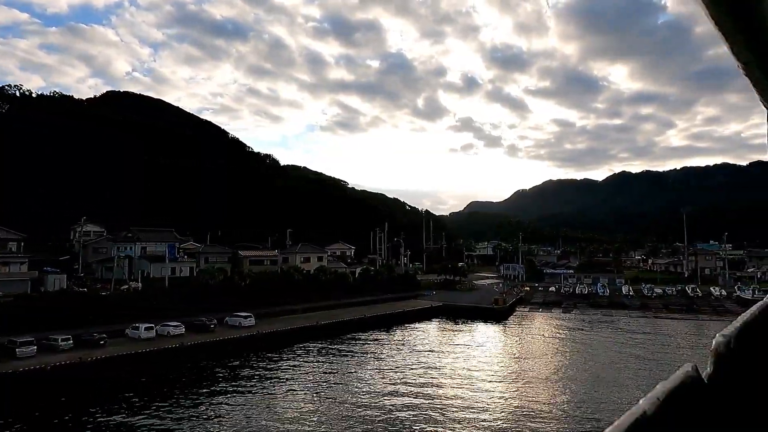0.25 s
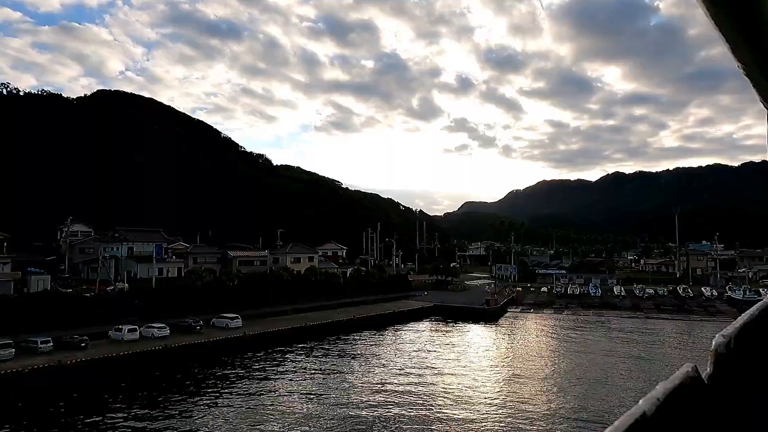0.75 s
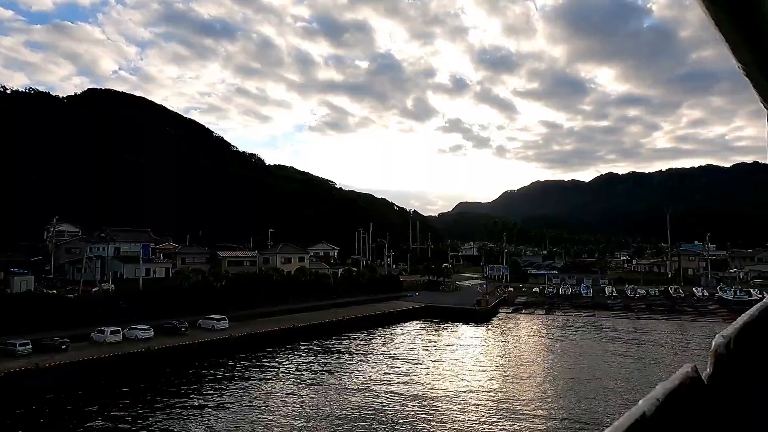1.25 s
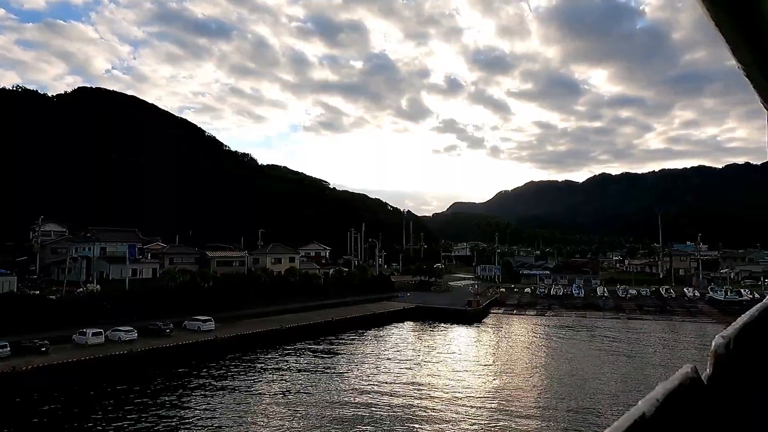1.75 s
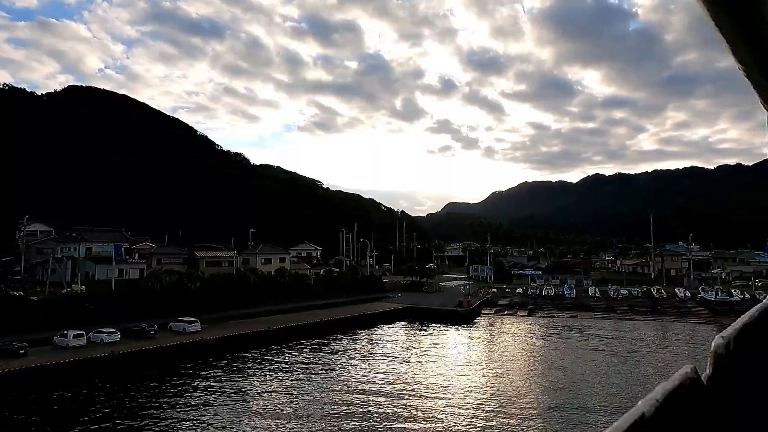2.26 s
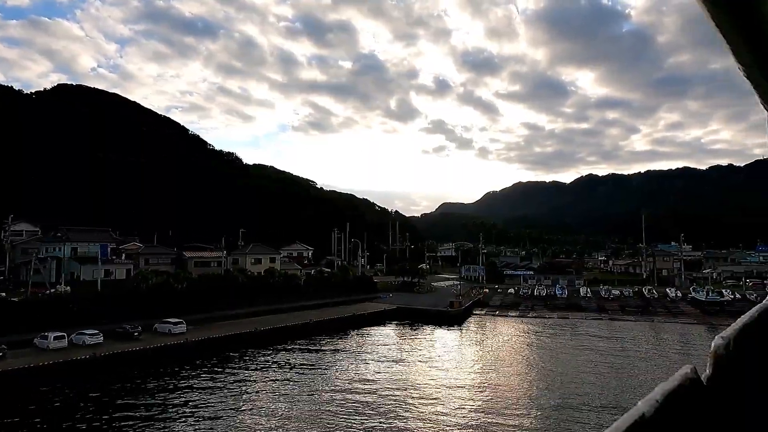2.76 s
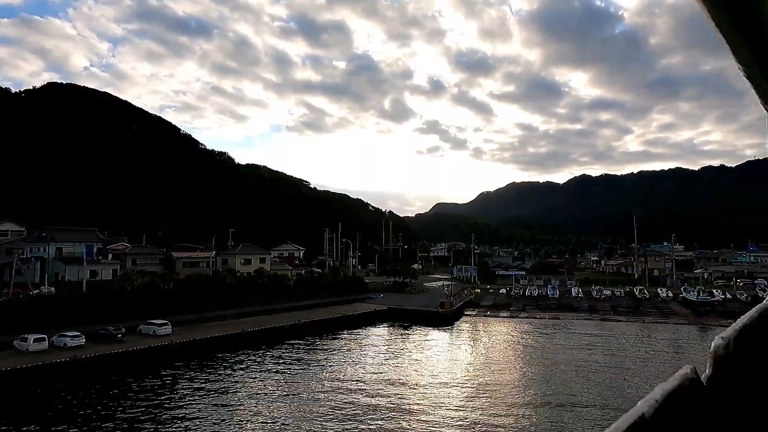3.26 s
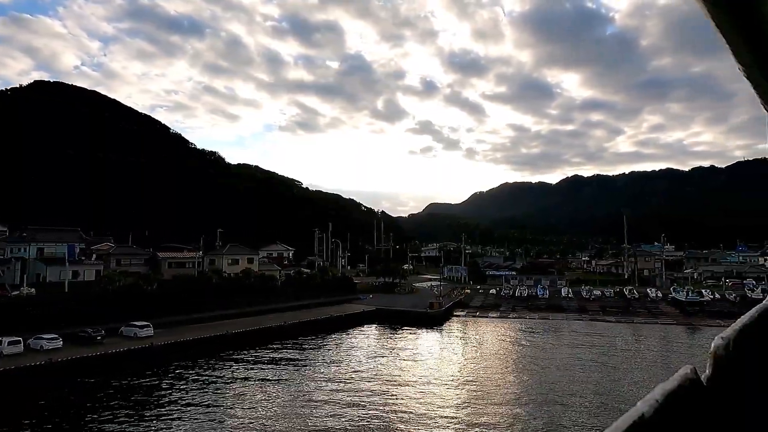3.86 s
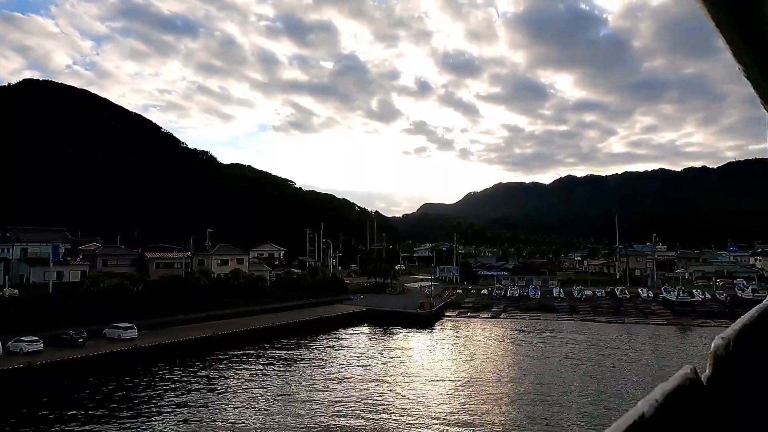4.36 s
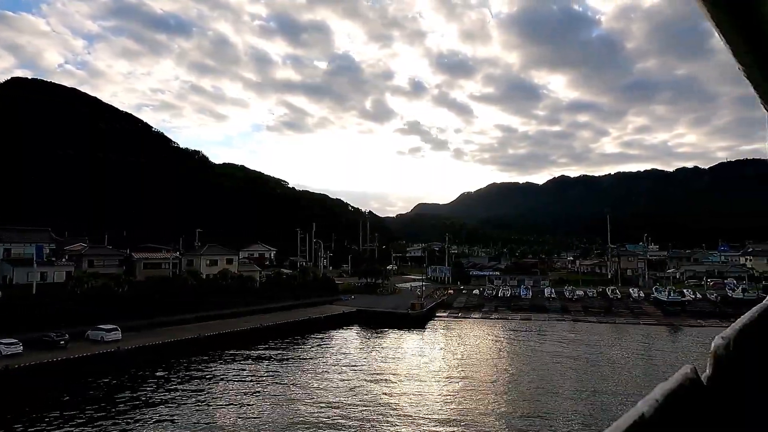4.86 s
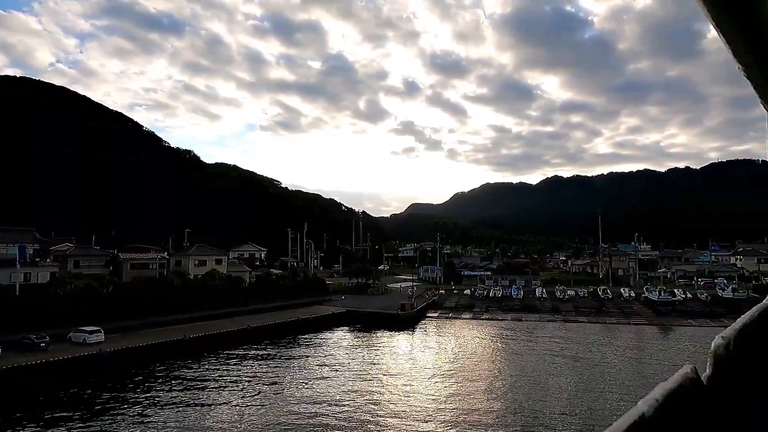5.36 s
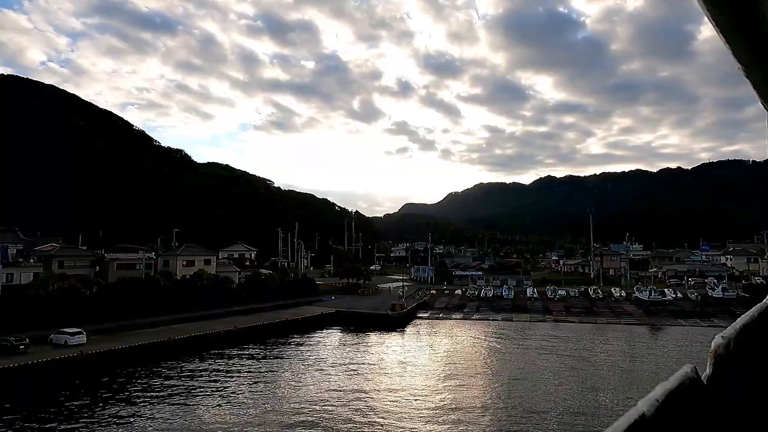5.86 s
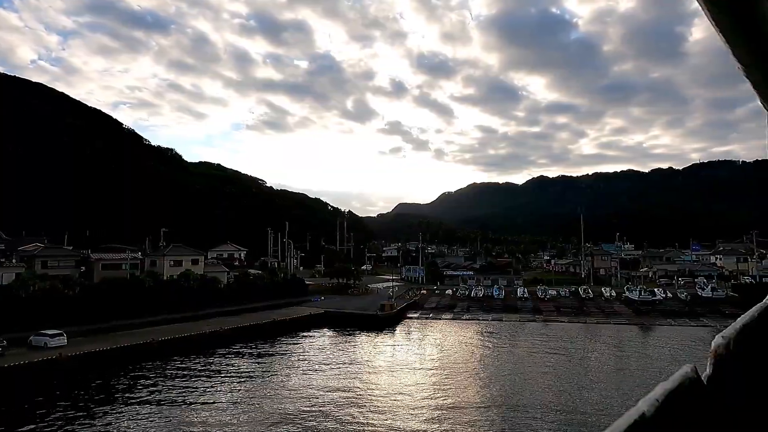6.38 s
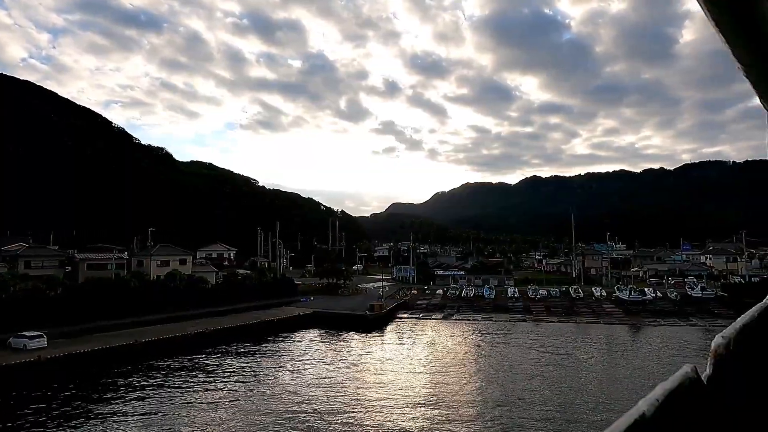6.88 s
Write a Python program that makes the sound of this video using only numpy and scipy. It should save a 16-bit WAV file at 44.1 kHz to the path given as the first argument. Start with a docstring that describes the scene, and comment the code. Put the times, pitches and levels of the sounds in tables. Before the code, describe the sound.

On the open deck of a ferry in a harbour, a low engine rumble pulses and gently surges under steady machine hum and a broad rushing noise. A thin, quiet metallic rattle comes and goes close by, now and then squeaking faintly. Scattered bird chirps are just audible in the distance. Late on, a few small dry clicks sound near the microphone while the drone carries on.

```python
"""A deep, loping engine drone over a wide roar: a ferry idling past a harbour, in stereo on the open deck.
Two slow diesels run slightly apart and beat; a generator set, a geared pump and other machinery add
their tones through the hull, and exhaust, ventilation and wash make the roar. Near the microphone a loose
fitting rattles with each firing of one diesel and sometimes squeaks, and there are a few dry ticks.
Small birds chirp far off on the shore."""
import sys
import numpy as np
from scipy import signal
from scipy.fft import rfft, irfft
from scipy.io import wavfile
from scipy.ndimage import uniform_filter1d

SR = 44100
rng = np.random.default_rng(int(sys.argv[2]) if len(sys.argv) > 2 else 0)


def unload_wav(signal):
    """Save mono or channel-first audio to the path in sys.argv[1] as 16-bit WAV at rate SR, clipped to [-1, 1]."""
    wavfile.write(
        sys.argv[1],
        SR,
        np.round(np.clip(np.atleast_2d(signal).T, -1, 1) * 32767).astype(np.int16),
    )


N = 313992

DIESEL_HZ, CYLINDERS = 2.2797, 6  # first diesel: cycles a second, firings a cycle
LOPE_AT = .47  # its uneven cylinders are loudest this far through each cycle
# The rumble surges and sinks. Each row: time in seconds, level change in dB.
SURGES = [(0.1, 0), (0.8, 0), (1.1, 1.5), (1.6, -.5), (2.2, -2), (2.6, 0), (3.2, 0), (3.7, 2.5), (4.3, -1),
          (4.7, 0), (5.2, 2), (5.6, -1), (5.9, 1.5), (6.3, -3), (7.0, 0)]


def gain_of(db):
    """Decibels to an amplitude factor."""
    return 10 ** (np.asarray(db) / 20)


def unit_rms(x):
    """Scales a signal to rms 1."""
    return x / np.sqrt(np.mean(x ** 2) + 1e-20)


def at_hz(points, hz):
    """Reads rows of frequency and value along a logarithmic frequency axis."""
    f, value = np.transpose(points)
    return np.interp(np.log(hz + 1), np.log(f + 1), value)


def add(mix, start_s, sound):
    """Mixes a sound in at its start time."""
    part = mix[round(start_s * SR):][:len(sound)]
    part += sound[:len(part)]


def drift(top_hz):
    """A slow random wander of rms 1: twelve sines in the decade below top_hz."""
    t = np.arange(0, N + 256, 256) / SR
    rates = np.geomspace(top_hz / 10, top_hz, 12)
    slow = sum(np.sin(2 * np.pi * (f * t + rng.random())) / np.sqrt(f) for f in rates)
    return np.interp(np.arange(N) / SR, t, unit_rms(slow))


def stereo(mid, side, hz):
    """Left and right at the microphone: the bass is central, the treble wide and a little to the left."""
    # Stereo width. Each row: frequency in Hz, side relative to mid in dB.
    width = [(30, -33.5), (60, -43), (110, -33.5), (200, -24), (380, -13.5), (700, -9), (1290, -6),
             (2380, -2), (4400, -4), (8120, -5.5), (15000, -1)]
    # Balance. Each row: frequency in Hz, left over right in dB.
    balance = [(60, 0.0), (110, 0.0), (200, 0.5), (380, 1.5), (700, 1.0), (1290, 1.5), (2380, 1.5),
               (4400, 1.0), (8120, 2.5), (15000, 1.5)]
    side = side * gain_of(at_hz(width, hz))
    lean = gain_of(at_hz(balance, hz) / 2)
    return np.array([(mid + side) * lean, (mid - side) / lean])


def birds():
    """Small birds far off: near-sine glides through three notes, smeared by echoes from the shore."""
    # Each row: start and length in seconds, first, middle and last pitch in Hz, level in dB.
    chirps = [ (.82, .07, 2800, 2700, 2760, -62), (.872, .07, 3320, 3320, 3300, -64),
              (.94, .055, 3290, 3270, 3250, -70), (1.98, .04, 6600, 6650, 6550, -66),
              (2.015, .08, 6600, 5000, 4500, -65), (2.045, .04, 6200, 5350, 4800, -66),
              (2.09, .045, 4500, 4900, 4650, -63), (2.12, .035, 5900, 5450, 4900, -69),
              (2.155, .035, 4850, 5000, 5100, -67), (3.005, .075, 5100, 5000, 5050, -68),
              (3.745, .07, 5150, 4830, 4800, -66), (3.855, .075, 4850, 4380, 4200, -67),
              (4.775, .045, 5000, 5050, 5150, -66), (4.83, .075, 5050, 5250, 4900, -66),
              (4.91, .07, 4800, 4500, 4200, -67), (4.98, .026, 4280, 4180, 4050, -63),
              (4.803, .028, 6450, 5800, 5150, -67), (4.89, .02, 6900, 6650, 6400, -73),
              (4.975, .016, 6850, 6780, 6700, -68), (5.1, .028, 6300, 6050, 5850, -64),
              (5.13, .022, 4750, 4950, 4950, -66), (5.592, .036, 5150, 5150, 5150, -63),
              (5.622, .023, 4350, 4250, 4150, -62), (6.9, .04, 2250, 2300, 2350, -60),
              (6.908, .032, 4650, 4930, 5080, -61), (6.94, .05, 5050, 4920, 5000, -62),
              (6.99, .022, 6900, 6720, 6550, -66), ]
    direct = np.zeros(N)
    for start_s, length_s, first_hz, middle_hz, last_hz, db in chirps:
        u = np.linspace(-1, 1, round(length_s * SR))
        hz = middle_hz + u * (last_hz - first_hz) / 2 + u ** 2 * ((first_hz + last_hz) / 2 - middle_hz)
        tremble = 1 + .017 * unit_rms(uniform_filter1d(rng.standard_normal(len(u)), 120))
        tone = np.sqrt(2) * np.sin(2 * np.pi * np.cumsum(hz * tremble) / SR)
        flutter_db = 2.5 * unit_rms(uniform_filter1d(rng.standard_normal(len(u)), 200)) - 2.5
        add(direct, start_s, gain_of(db + flutter_db) * tone * signal.windows.tukey(len(u), .25))
    t = np.arange(8000) / SR
    shore = rng.standard_normal((2, 8000)) * gain_of(-60 * t / .25) * (t > .008)
    echoes = signal.oaconvolve(direct[None], shore / np.linalg.norm(shore[0]), axes=1)[:, :N]
    return direct * gain_of([[1], [-1]]) + gain_of(-1.5) * echoes


def ticks():
    """Faint dry clicks nearby, dead centre: a soft-edged cycle or two with a little noise behind."""
    # Each row: start in seconds, level in dB, centre frequency in Hz.
    clicks = [(3.28, -63, 10000), (5.912, -63, 10000), (6.0677, -62, 10000), (6.1904, -63, 10000),
              (6.4094, -58, 7000), (5.483, -48, 5000), (5.7152, -46, 8000), (6.2942, -47, 6000)]
    t, out = np.arange(800) / SR, np.zeros(N)
    from_centre_s = t - .0003
    treble_band = signal.butter(2, [4000, 10000], "band", fs=SR)
    for start_s, db, hz in clicks:
        snap = np.sin(2 * np.pi * hz * from_centre_s) * np.exp(-(from_centre_s * hz / .77) ** 2)
        tail = signal.lfilter(*treble_band, rng.standard_normal(800)) * np.exp(-t / .004)
        add(out, start_s, gain_of(db) * (snap + .1 * tail))
    return out


def squeaks():
    """Brief rubs excite one narrow mode of the loose fitting, a little left of the microphone."""
    # Each row: start in seconds, level in dB.
    rubs = [(0.124, -73), (0.272, -73), (0.487, -70), (0.714, -75), (0.866, -71), (0.92, -73), (1.092, -66),
            (1.143, -73), (1.3, -83), (1.37, -78), (1.58, -71), (2.47, -78), (3.35, -79), (3.79, -75),
            (4.006, -74), (5.332, -71), (5.393, -75), (6.415, -69)]
    mode_hz, width_hz, length_s = 8540, 120, .033
    radius = np.exp(-np.pi * width_hz / SR)
    resonator = [1, -2 * radius * np.cos(2 * np.pi * mode_hz / SR), radius ** 2]
    out = np.zeros(N)
    for start_s, db in rubs:
        rub = rng.standard_normal(3000)[:round(length_s * SR)]
        ring = unit_rms(signal.lfilter([1], resonator, rub))
        add(out, start_s, gain_of(db) / np.sqrt(2) * ring * signal.windows.tukey(len(rub), .6))
    return out * gain_of([[1.5], [-1.5]])


def shakes():
    """Start in seconds and level in dB of the shake from each firing: mostly faint, some hard."""
    # Firings that shake the fitting harder. Each row: rough time in seconds, level in dB.
    hard_shakes = [(0.06, -57), (0.205, -56), (0.28, -50.5), (0.35, -58), (0.5, -53), (0.71, -57.5),
                   (0.87, -53), (0.94, -57.5), (1.08, -54), (1.16, -54), (1.23, -58), (1.38, -61),
                   (1.45, -60), (1.59, -57), (1.88, -55), (2.11, -61), (2.32, -57), (2.55, -64),
                   (2.62, -60), (2.7, -64), (2.77, -55), (2.99, -51.5), (3.21, -55), (3.35, -62),
                   (3.57, -62), (3.72, -61), (3.79, -57), (3.86, -54), (4.01, -59), (4.23, -58),
                   (4.45, -63), (4.67, -63), (4.89, -63), (5.1, -64), (5.17, -59), (5.25, -63), (5.4, -57),
                   (5.62, -61), (5.84, -58), (6.05, -63), (6.27, -53), (6.49, -55), (6.71, -56)]
    firings_s = np.arange(.0583, N / SR, 1 / (CYLINDERS * DIESEL_HZ))
    db = -75 + rng.standard_normal(len(firings_s))
    for hard_s, hard_db in hard_shakes:
        db[np.argmin(abs(firings_s - hard_s))] = hard_db
    return zip(firings_s, db)


def contacts(n, per_second=1600, spread_db=3):
    """Metal chattering on metal: n samples of dense, unequal clicks over a fine hiss."""
    hits = rng.random(n) < per_second / SR
    size_db = spread_db * np.minimum(rng.exponential(1, n), 4)
    hiss = rng.standard_normal(n)
    clicks = hits * np.sign(hiss) * gain_of(size_db)
    return unit_rms(clicks) + .6 * hiss


def rattle():
    """The loose fitting, a little to the left: each shake is a short burst of tiny metal contacts."""
    # The fitting's bright colour. Each row: frequency in Hz, gain in dB.
    colour = [(2000, -8), (4000, 0.5), (6000, 5), (7500, 7.5), (9500, -7), (10600, -6), (12000, -19),
              (16000, -25.5)]
    n, rise_s, t60_s = 6000, .005, .17
    t, out = np.arange(n) / SR, np.zeros((2, N))
    response = gain_of(at_hz(colour, np.fft.rfftfreq(n, 1 / SR)))
    for start_s, db in shakes():
        mid, side = contacts(n), contacts(n)
        envelope = (1 - np.exp(-t / rise_s)) * gain_of(db - 60 * t / t60_s) / 2
        for channel, chatter, lean_db in ((0, mid + .59 * side, 1.8), (1, mid - .87 * side, -1.7)):
            burst = unit_rms(irfft(rfft(chatter) * response))
            add(out[channel], start_s, envelope * gain_of(lean_db) * burst)
    return out


def roar():
    """Exhaust, ventilation and wash all round the deck: deep, coloured noise that surges and lopes."""
    # The bare noise. Each row: frequency in Hz, spectral density in dB.
    spectrum = [(8, -63), (20, -46.5), (45, -56), (135, -57), (300, -62.5), (760, -77.5), (1110, -77),
                (1560, -83), (2440, -92), (4440, -98), (7260, -106), (9000, -120), (12000, -133),
                (16000, -145)]
    # Humps and dips in the roar's colour. Each row: centre in Hz, width in Hz, lift in dB.
    humps = [(67, 34, 5.5), (109, 26, 5.5), (156.6, 8.1, 7), (204, 26, 6), (243, 6, 1.5), (260, 5.2, -2),
             (285.5, 9.8, 4.5), (307, 9.8, 0.5), (324.7, 19, 3.5), (342, 9, 8.5), (348.7, 15, -4),
             (376, 15, 5), (424, 29, 5.5), (463, 17, 5), (542.3, 27, 7), (591.4, 36, 9.5), (668, 100, 3.5),
             (1026, 260, 2), (669, 9, 1.5), (702, 15, 4), (751, 13, 5), (4960, 260, 2), (6600, 170, -3.5)]
    # The surges are mostly in the bass. Each row: frequency in Hz, share of the surge.
    surge_share = [(70, 0.9), (350, 0.13), (2000, .05)]
    # The roar grows slowly. Each row: frequency in Hz, rise in dB per second.
    growth = [(70, .1), (350, 0.06), (2000, 0.17)]
    # The roar lopes with the first diesel. Each row: frequency in Hz, swing in dB.
    lope_depth = [(45, -1.5), (75, 4), (130, -1), (300, 0)]
    # The midrange rises and falls. Each row: time in seconds, level change in dB.
    midrange_level = [(0, -0.5), (2.3, 0), (2.75, 1.4), (3.3, .3), (4.3, -1), (5.3, -0.2), (7.1, 0.5)]
    # The bands that follow it. Each row: frequency in Hz, share of that change.
    midrange_share = [(250, 0), (450, 1), (3000, 1), (6000, .3)]
    bins_hz = np.fft.rfftfreq(N, 1 / SR)
    lift_db = sum(db / (1 + (2 * (bins_hz - centre) / width) ** 4) for centre, width, db in humps)
    colour = gain_of(at_hz(spectrum, bins_hz) + lift_db) * np.sqrt(SR / 2)
    mid, side = rfft(rng.standard_normal((2, N))) * colour
    steady = irfft(stereo(mid, side, bins_hz), N)
    hz, t, bands = signal.stft(steady, SR, nperseg=1024, noverlap=768)
    swell_db = np.outer(at_hz(surge_share, hz), np.interp(t, *np.transpose(SURGES)))
    swell_db += np.outer(at_hz(growth, hz), t - t.mean())
    swell_db += np.outer(at_hz(lope_depth, hz), np.cos(2 * np.pi * (DIESEL_HZ * t - LOPE_AT)))
    swell_db += np.outer(at_hz(midrange_share, hz), np.interp(t, *np.transpose(midrange_level)))
    # The level flickers in faint patches, most in the treble, and the hiss puffs with each firing.
    speckle = rng.standard_normal(bands.shape[1:])
    patches = unit_rms(uniform_filter1d(uniform_filter1d(speckle, 14, axis=0), 12, axis=1))
    puffs = np.cos(2 * np.pi * (CYLINDERS * DIESEL_HZ * t - .9))
    treble_depth_db = 3.6 * (hz / (hz + 6000))[:, None] ** 2
    bands = bands * gain_of(swell_db + (.49 + treble_depth_db) * patches + treble_depth_db * puffs)
    return signal.istft(bands, SR, nperseg=1024, noverlap=768)[1][:, :N]


def tone_swell(hz):
    """Tones near 280 Hz and 690 Hz swell and sink in two groups: their change in dB, 0 for the rest."""
    # Each row: time in seconds, level change of the lower and of the upper group in dB.
    group_levels = [(.3, -3, 0), (.6, 0, 0), (.95, -5, -3), (1.3, 1, -2), (1.7, -3, -2), (2.0, 1.5, -1.5),
                    (2.4, 0, -1), (2.75, -2, 3), (3.2, -3, 0), (3.55, 1, 1), (4.1, -6, 0), (4.5, 2, 0),
                    (5.2, 1.5, 1.5), (5.5, -1, -2), (5.75, -1, .5), (6.1, 2.5, 0), (6.5, 2.5, 0),
                    (6.8, -1, 0), (7.1, -1, 2)]
    # Each row: a group's low and high edge in Hz.
    group_edges = [(272, 283), (665, 700)]
    times, *curves = np.transpose(group_levels)
    return sum(np.interp(np.arange(N) / SR, times, db)
               for db, (low, high) in zip(curves, group_edges) if low < hz < high)


def machine(hz, tones, wander, waver_db, waver_hz, lope=0):
    """Tones locked to one shaft whose speed wanders a little; each wavers on its way up to the deck."""
    cycles = hz * np.cumsum(1 + wander * drift(.5005)) / SR
    surge = gain_of(np.interp(np.arange(N) / SR, *np.transpose(SURGES)))
    throb = unit_rms(1 + lope * np.cos(2 * np.pi * (cycles - LOPE_AT))) * surge
    out = np.zeros((2, N))
    for multiple, db in tones:
        loping = lope > 0 and multiple >= 24  # only a loping engine's upper tones throb and surge
        scatter_cycles = .8 if loping else 1
        phase = 2 * np.pi * (multiple * (cycles - LOPE_AT) + scatter_cycles * rng.random())
        waver = unit_rms(gain_of(waver_db * drift(waver_hz)))
        level = np.sqrt(2) * gain_of(db + tone_swell(multiple * hz)) * waver
        if loping:
            level *= throb
        mid, side = np.sin(phase), np.sin(phase + 2 * np.pi * rng.random())
        out += level * stereo(mid, side, multiple * hz)
    return out


def machinery_hums():
    """Assorted steady machinery hums and whines about the ship."""
    # Each row: frequency in Hz (a multiple of 1 Hz), level in dB.
    hums = [(19.5, -37), (172.6, -52), (208.35, -49), (460.7, -56), (525.6, -59), (671.04, -53),
            (696.6, -61), (876, -69), (931.2, -64), (1207.8, -72), (1342.1, -71), (1380.4, -74)]
    return machine(1, hums, wander=.0002, waver_db=2, waver_hz=4)


def pump():
    """A geared pump whines through the hull in one series of quickly wavering harmonics."""
    # Each row: harmonic number, level in dB.
    harmonics = [(1, -40), (2, -40), (3, -51), (4, -54), (5, -51), (6, -59), (7, -65), (8, -63), (9, -69),
                 (10, -73), (11, -67), (12, -80)]
    return machine(138.71, harmonics, wander=.0004, waver_db=1.8, waver_hz=5)


def generator():
    """The generator set holds its speed closely and drones evenly through the hull."""
    # Each row: multiple of the cycle rate, level in dB.
    harmonics = [(6, -26), (9, -40), (12, -36), (13, -49), (17, -52), (18, -48), (20, -39), (22, -50),
                 (25, -58), (26, -45), (27, -58), (28, -48), (30, -54), (32, -47), (33, -48), (34, -43),
                 (36, -62), (38, -52), (39, -62), (42, -53), (43, -60), (44, -56), (45, -60), (48, -62),
                 (50, -60), (51, -63), (52, -63), (54, -64), (55, -59)]
    return machine(9.9525, harmonics, wander=.0002, waver_db=.5, waver_hz=1.4)


def diesels():
    """Two slow main diesels below deck run slightly apart and beat; uneven cylinders make one lope."""
    # Tones of each engine. Each row: multiple of its cycle rate, level in dB.
    first_tones = [(6, -26), (8, -28), (9, -33), (12, -32), (14, -47), (15, -38), (16, -40), (17, -46),
                   (18, -43), (19, -50), (20, -50), (21, -39), (22, -47), (24, -43), (25, -47), (27, -40),
                   (28, -43), (29, -39), (30, -36), (32, -44), (33, -33), (34, -36), (35, -40), (36, -35),
                   (37, -44), (38, -44), (39, -44), (42, -46), (45, -46), (48, -50), (49, -54)]
    second_tones = [(6, -35), (8, -31), (9, -41), (10, -48), (12, -29), (15, -42), (19, -46), (22, -49),
                    (24, -47), (25, -45), (27, -38), (28, -45), (30, -37), (31, -45), (32, -41), (33, -41),
                    (34, -40), (36, -47), (37, -41), (38, -45), (39, -41), (41, -46), (42, -47), (44, -45),
                    (45, -43), (46, -47), (48, -48), (49, -47), (82, -51), (83, -49), (84, -48)]
    first = machine(DIESEL_HZ, first_tones, wander=.0014, waver_db=2, waver_hz=1.5, lope=.33)
    second = machine(2.3383, second_tones, wander=.0014, waver_db=2, waver_hz=1.5)
    return first + second


def scene():
    """From the open deck: machinery below, the roar all round, small noises close by, birds ashore."""
    drone = diesels() + generator() + pump() + machinery_hums()
    return drone + roar() + rattle() + squeaks() + ticks() + birds()


def record(dry):
    """The microphone's preamplifier softly rounds the loud swings; a low-pass takes off the very top."""
    ceiling, drive_db, cutoff_hz = .55, 1, 15700
    rounded = ceiling * np.tanh(gain_of(drive_db) * dry / ceiling)
    low_pass = signal.firwin(511, cutoff_hz, window=("kaiser", 9), fs=SR)
    return signal.oaconvolve(rounded, low_pass[None], "same")


dry = scene()
out = record(dry)
unload_wav(out)
```